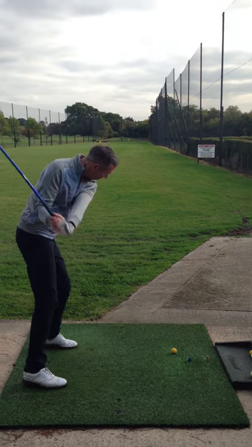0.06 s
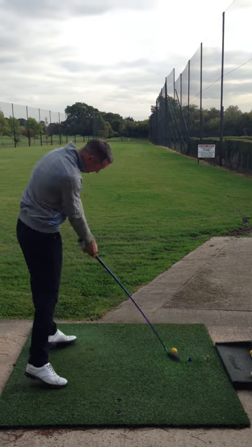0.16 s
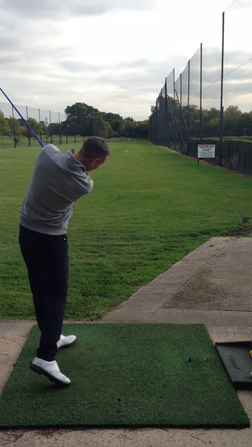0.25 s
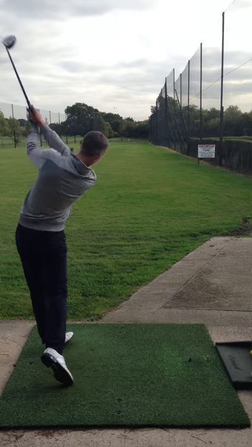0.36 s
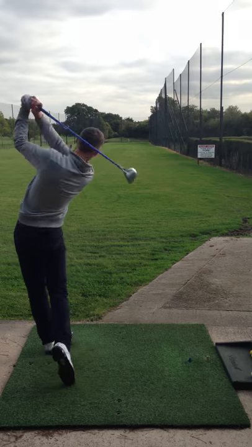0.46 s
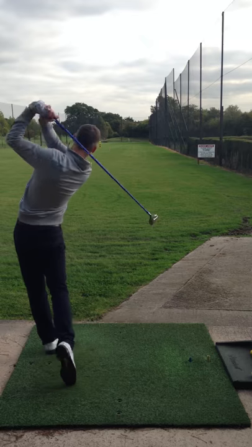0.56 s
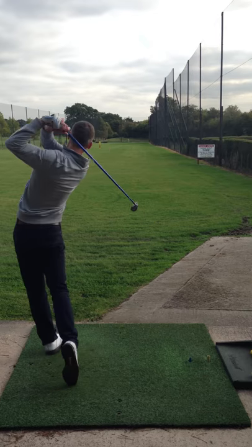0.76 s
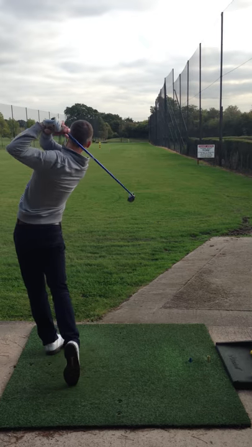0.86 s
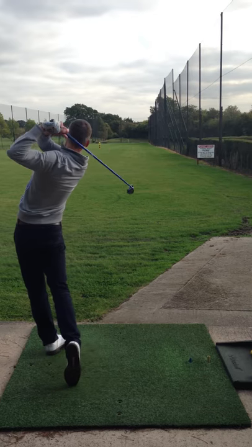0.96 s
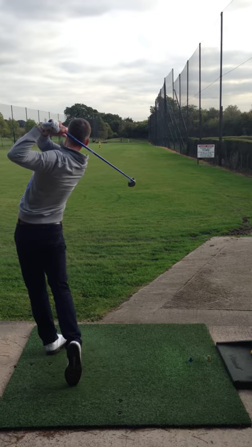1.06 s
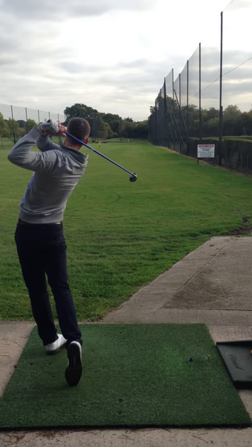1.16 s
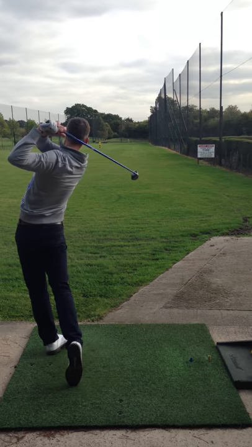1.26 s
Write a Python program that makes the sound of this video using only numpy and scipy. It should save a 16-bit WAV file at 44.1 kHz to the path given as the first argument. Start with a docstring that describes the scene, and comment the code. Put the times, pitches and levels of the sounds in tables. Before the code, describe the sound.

One sharp, metallic golf shot cracks close to the microphone, just after a soft foot thud and a quick whoosh. Light ticks of the bouncing tee and a faint echo follow, leaving a barely audible traffic rumble in the open air.

```python
"""A golfer drives a ball off a mat at an outdoor range, with traffic in the distance. Clothes rustle, a foot
thuds and the club whooshes down through the air. Its hollow metal head cracks against the ball, so loudly
that a limiter turns everything down. The hitting bay rings briefly, the tee skitters away and a faint
echo returns. Shoes and club make a few small clicks while the traffic slowly swells back."""
import sys
import numpy as np
from scipy import signal
from scipy.fft import rfft, irfft
from scipy.io import wavfile
from scipy.ndimage import uniform_filter1d, minimum_filter1d

SR = 44100
rng = np.random.default_rng(int(sys.argv[2]) if len(sys.argv) > 2 else 0)


def waveform_to_disk(signal):
    """Save audio, clipped to [-1, 1], as 16-bit WAV at the path in sys.argv[1]."""
    frames = np.transpose(np.atleast_2d(signal))
    scaled = np.clip(frames, -1, 1) * 32767
    samples = np.round(scaled).astype(np.int16)
    wavfile.write(sys.argv[1], SR, samples)


N = 57330
T = np.arange(N) / SR
STRIKE_S = .272  # the club meets the ball


def from_db(db):
    """Turn decibels into a number to multiply a sound by."""
    return 10 ** (np.asarray(db) / 20)


def unit_power(x):
    """Scale a sound so that its average power is one."""
    return x / np.sqrt(np.mean(x ** 2) + 1e-20)


def over_time(rows):
    """Join a table's points in time with straight lines, giving one curve for each later column."""
    times, *columns = np.transpose(rows)
    return [np.interp(T, times, column) for column in columns]


def noise(spectrum):
    """Steady noise, with a table saying how strong its low and high pitches are."""
    hz, db = np.transpose(spectrum)
    bins_hz = np.maximum(np.fft.rfftfreq(N, 1 / SR), 1)
    gains = from_db(np.interp(np.log(bins_hz), np.log(hz), db))
    return unit_power(irfft(rfft(rng.standard_normal(N)) * gains, N))


def lowpass(x, hz, order=2):
    """Soften everything above hz; a higher order cuts more steeply."""
    return signal.sosfilt(signal.butter(order, hz, fs=SR, output="sos"), x + 1e-18)


def highpass(x, hz):
    """Soften everything below hz."""
    return signal.sosfilt(signal.butter(2, hz, "high", fs=SR, output="sos"), x + 1e-18)


def noise_band(hz, width_hz):
    """Noise around a pitch that may glide: the narrower it is, the more it sounds like a tone."""
    wobble = lowpass(rng.standard_normal(N) + 1j * rng.standard_normal(N), width_hz / 2)
    phase = 2 * np.pi * np.cumsum(hz * np.ones(N)) / SR
    return unit_power((wobble * np.exp(1j * phase)).real)


def burst(peak_s, rise_s, fade_s):
    """A loudness curve that swells until peak_s, then falls 60 dB in fade_s."""
    return np.exp(np.minimum(T - peak_s, 0) / rise_s) * from_db(-60 * np.maximum(T - peak_s, 0) / fade_s)


def after_strike(fade_s):
    """A loudness curve that jumps up as the ball is hit, then falls 60 dB in fade_s."""
    return (T >= STRIKE_S) * from_db(-60 * np.maximum(T - STRIKE_S, 0) / fade_s)


def ring(start_s, hz, fade_s):
    """One pure tone of a struck object, falling 60 dB in fade_s."""
    age = np.maximum(T - start_s, 0)
    return np.sin(2 * np.pi * hz * age) * from_db(-60 * age / fade_s)


# The low rumble of traffic and open air: pitch_hz, level_db
TRAFFIC_SPECTRUM = [(25, -32), (80, -16.5), (135, 2), (190, -1.5), (265, 2), (400, -11.5), (800, -15),
                    (1500, -15.5), (3000, -21), (6000, -25.5), (11000, -29), (15000, -29.5)]
# How loud the rumble is as time passes: time_s, level_db
TRAFFIC_LEVELS = [(0, -60), (.3, -62.5), (.6, -59), (.9, -57), (1.3, -57)]
def traffic():
    """Distant traffic and outdoor air blend into a soft rumble."""
    return from_db(over_time(TRAFFIC_LEVELS)[0]) * noise(TRAFFIC_SPECTRUM)


# The sound of rubbing cloth: pitch_hz, level_db
CLOTH_SPECTRUM = [(40, -15), (170, -3), (330, 13), (600, 0), (1400, 1.5), (3000, -4.5), (7000, -10),
                  (15000, -15.5)]
# How loud the rustle is as time passes: time_s, level_db
CLOTH_LEVELS = [(0, -63.5), (.17, -62), (.24, -74.5), (.3, -95.5)]
def clothes():
    """Clothes rustle as the downswing starts."""
    return from_db(over_time(CLOTH_LEVELS)[0]) * noise(CLOTH_SPECTRUM)


# Small clicks and scuffs: peak_s, level_db, pitch_hz, width_hz, fade_s
SCUFFS = [(0.043, -58, 1400, 296, 0.074), (.688, -56, 3600, 600, 0.065), (.688, -57, 7500, 4000, 0.043),
          (0.764, -61, 1760, 900, 0.23), (.939, -61, 9000, 7000, .012), (.975, -55.5, 6170, 4000, .055),
          (.978, -65, 3750, 400, .07), (1.083, -59.5, 2380, 3000, 0.068)]
def scuffs():
    """Shoes and club click and scuff as the body turns, each a short puff of noise."""
    return sum(from_db(db) * burst(peak_s, rise_s=.0011, fade_s=fade_s) * noise_band(hz, width_hz)
               for peak_s, db, hz, width_hz, fade_s in SCUFFS)


def footstep(peak_s=.0985, spread_s=.002, pitch_hz=198):
    """A foot lands with a soft thud: a low tone so short that it barely swings once."""
    offset_s = T - peak_s
    pulse = np.exp(-.5 * (offset_s / spread_s) ** 2)
    thud = from_db(-33.5) * pulse * np.cos(2 * np.pi * pitch_hz * offset_s)
    return highpass(thud, hz=128)


# The shaft's wind tone during the downswing: time_s, pitch_hz, level_db
DOWNSWING = [(.15, 449.7, -77), (.187, 541, -61), (.195, 590, -46.5), (.202, 630, -46), (.211, 699, -38),
             (.24, 769.8, -33), (.263, 831.7, -29), (.271, 980, -28.5), (.279, 899, -48), (.32, 600, -71.5),
             (.38, 450, -88.5)]
# Swirls of air behind the club, compared with that tone: pitch_ratio, width_ratio, level_db
SWIRLS = [(1.0, .18, -1), (.68, .25, -10.5), (1.4, .3, -12), (2, .2, -15)]
# The hiss of churned air: pitch_hz, level_db
HISS_SPECTRUM = [(60, -25.5), (200, -14), (400, -4), (1000, -2), (2500, 2), (5500, -3), (9000, -10.5),
                 (15000, -17.5)]
def whoosh():
    """The club sheds swirls of air, whose tones rise with its speed over a whistle and a hiss."""
    hz, db = over_time(DOWNSWING)
    swirls = sum(from_db(level_db) * noise_band(hz * ratio, width * ratio * hz.max())
                 for ratio, width, level_db in SWIRLS)
    whistle = from_db(-7) * np.sqrt(2) * np.sin(2 * np.pi * np.cumsum(hz) / SR)
    hiss_db = db.max() - 6.5 + 1.4 * (db - db.max())  # swells and fades more steeply than the tones
    return from_db(db) * (swirls + whistle) + from_db(hiss_db) * noise(HISS_SPECTRUM)


# The rush of the club head over the mat: pitch_hz, level_db
RUSH_SPECTRUM = [(30, -6), (120, -4.5), (500, -10), (1100, -8), (1800, 8), (3000, -10), (4500, -15),
                 (6500, -8), (9500, -10.5), (14000, -32)]
def head_rush():
    """The bulky head rushes over the mat just before the hit, with a lower hum as it nears the ground."""
    rush = from_db(-19) * burst(peak_s=.27, rise_s=.0024, fade_s=.028) * noise(RUSH_SPECTRUM)
    hum = from_db(-37) * burst(peak_s=.263, rise_s=.024, fade_s=.035) * noise_band(375.5, width_hz=150)
    return rush + hum


# The tones of the hollow club head and the ball: pitch_hz, level_db, fade_s, rise_s
HEAD_TONES = [(1020, -26, .02, .0005), (1700, -21, 0.012, .0005), (2220, -27.5, .012, .0005),
              (3020, -26.5, .022, 0.0004957), (3650, -28, .012, .0004), (5100, -8.5, .014, .0008),
              (5448, -10, .013, .0008), (6012, -1, .0125, .0008), (7060, -12, .014, 0.00011),
              (7450, -10, .007, .0001), (8037, -13.5, .009, .0001), (8940, -22.5, .024, .0001),
              (10152, -21, .014, .0001), (12460, -25.5, .016, .0003), (14350, -29, .014, .0003)]
def club_head(start_s):
    """The struck metal shell's tones build up and ring for a few milliseconds."""
    age = np.maximum(T - start_s, 0)
    # (-1) ** k makes every second tone start by swinging the other way
    tones = sum((-1) ** k * from_db(db) * ring(start_s, hz, fade_s) * (1 - np.exp(-age / rise_s))
                for k, (hz, db, fade_s, rise_s) in enumerate(HEAD_TONES))
    return from_db(12) * lowpass(tones, hz=14000)


def strike():
    """The head rings and cracks against the ball while its underside bumps the mat."""
    crack = lowpass(after_strike(fade_s=.016) * rng.standard_normal(N), hz=5000, order=1)
    bump = ring(STRIKE_S, hz=130, fade_s=.012)
    return club_head(STRIKE_S) + from_db(-6) * crack + from_db(-18.5) * bump


# The ring of the hitting bay: pitch_hz, level_db
BAY_SPECTRUM = [(100, -16), (250, -3.5), (400, -3), (800, -9), (1700, -2), (2600, 1), (3400, -11),
                (4500, -11), (5600, 1.5), (6600, 3), (7500, -3.5), (10000, -7), (15000, -16.5)]
def hitting_bay():
    """The crack bounces off a near wall and rings briefly around the golfer's bay."""
    wall = from_db(-26.5) * club_head(STRIKE_S + .0125)
    swell = (T >= STRIKE_S) * burst(STRIKE_S + .01, rise_s=.01, fade_s=.175)
    return wall + from_db(-27) * swell * noise(BAY_SPECTRUM)


# Sound scattered by trees and fences: pitch_hz, level_db
FIELD_SPECTRUM = [(150, -13.5), (350, -0.5), (600, -8), (1000, -7), (1600, -3), (2600, -1), (3800, -12.5),
                  (6300, -6.5), (8000, -16.5), (14000, -28)]
def open_field():
    """Trees and fences scatter the crack into a fading tail; a soft hiss returns from the far fence."""
    scatter = from_db(-48) * after_strike(fade_s=1) * noise(FIELD_SPECTRUM)
    swell = (T >= STRIKE_S) * burst(peak_s=.63, rise_s=.12, fade_s=.6)
    return scatter + from_db(-65.5) * swell * noise_band(6300, width_hz=1900)


# Each time the tee lands: start_s, level_db
TEE_BOUNCES = [(0.338, -37), (0.3942, -33.5), (.409, -44), (0.4523, -36), (.459, -43), (.5115, -45),
               (.569, -48.5)]
# The tones of the tee: pitch_hz, level_db, fade_s
TEE_TONES = [(1640, -6, 0.016), (1905, 1, 0.0092), (2395, -5, 0.016), (2740, -5, 0.012),
             (5600, -11.5, 0.0053)]
def tee():
    """Each bounce rings the tee's tones in a slightly different mix; it is too small to give off bass."""
    ticks = sum(from_db(bounce_db + tone_db + rng.normal(0, 1)) * (-1) ** k * ring(start_s, hz, fade_s)
                for start_s, bounce_db in TEE_BOUNCES
                for k, (hz, tone_db, fade_s) in enumerate(TEE_TONES))
    return highpass(ticks, hz=1100)


# Echoes of the club head from far away: start_s, level_db
FAR_ECHOES = [(0.584, -42), (.5973, -55)]
def far_echoes():
    """The crack returns from far obstacles, dulled by its long trip through the air."""
    echoes = sum(from_db(db) * club_head(start_s) for start_s, db in FAR_ECHOES)
    return lowpass(echoes, hz=7025, order=8)


def scene():
    """Add all the sounds together in one channel."""
    background = traffic()
    shot = whoosh() + head_rush() + strike()
    aftermath = hitting_bay() + open_field() + tee() + far_echoes()
    golfer = scuffs() + footstep() + clothes()
    return (background + shot + aftermath + golfer)[None]


def record(dry, limit_db=-1.5, recovery_db_per_s=7, lookahead_s=.002, ceiling=.7):
    """A limiter turns the sound down at the crack and slowly back up; peaks and top treble are trimmed."""
    excess_db = np.maximum(20 * np.log10(np.abs(dry[0]) + 1e-9) - limit_db, 0)
    recovery_db = recovery_db_per_s * T
    cut_db = np.maximum.accumulate(excess_db + recovery_db) - recovery_db
    span = int(lookahead_s * SR)
    gain_db = uniform_filter1d(minimum_filter1d(-cut_db, span), span)  # eases down just before the peak
    limited = dry * from_db(gain_db)
    rounded = limited / (1 + (limited / ceiling) ** 8) ** (1 / 8)
    treble_cut = signal.ellip(10, .2, 70, 15250, fs=SR, output="sos")  # steep drop above 15250 Hz
    return signal.sosfilt(treble_cut, rounded)


dry = scene()
out = record(dry)
waveform_to_disk(out)
```